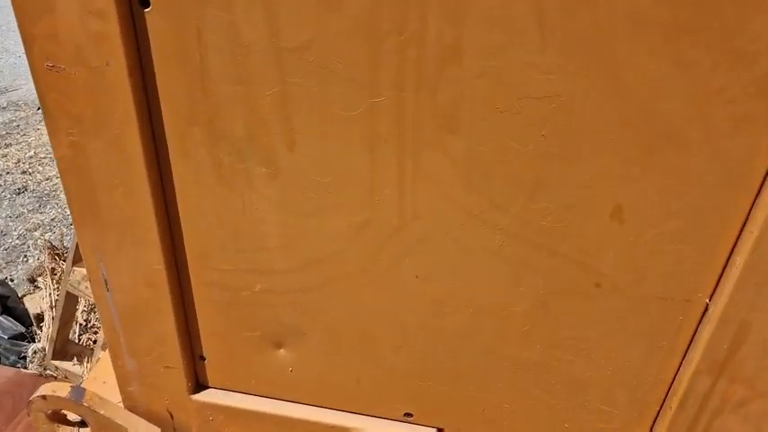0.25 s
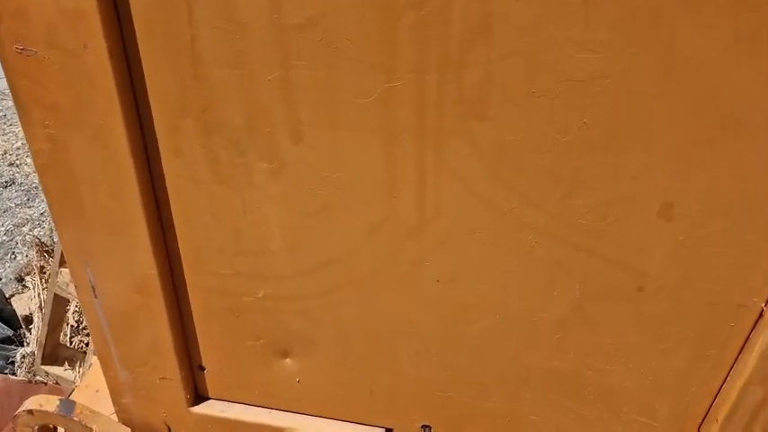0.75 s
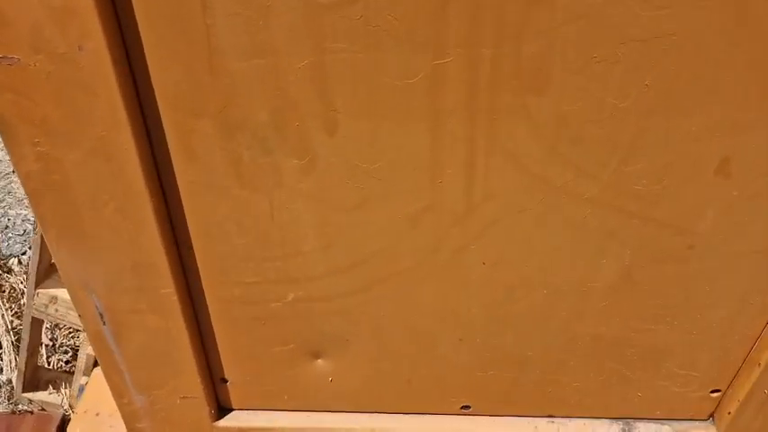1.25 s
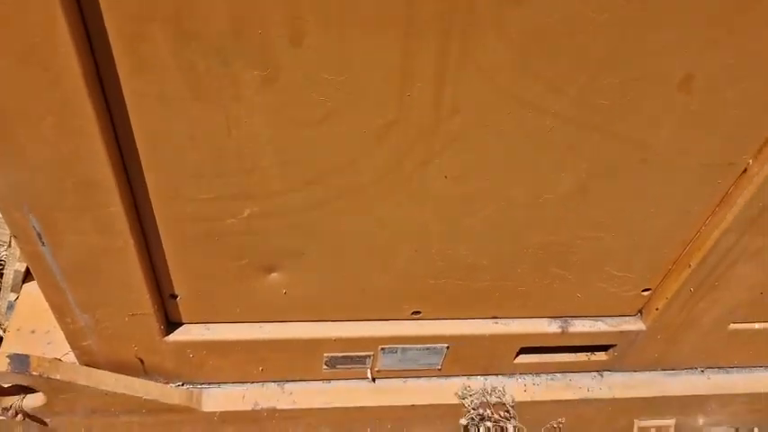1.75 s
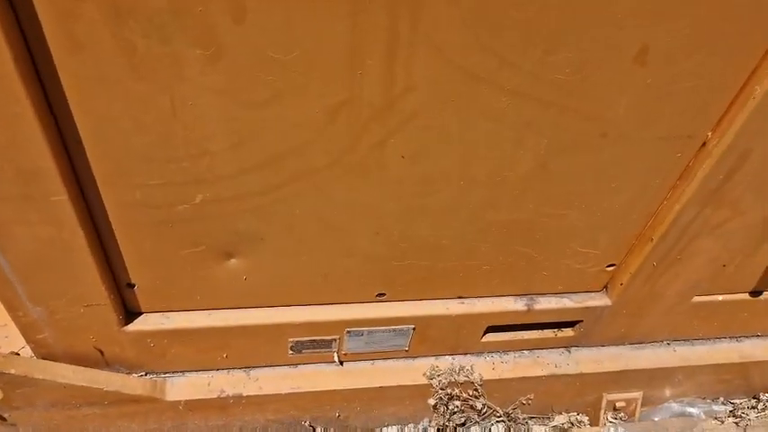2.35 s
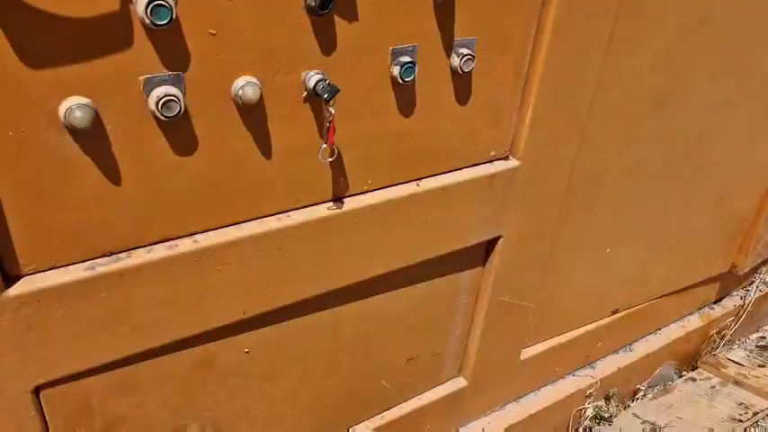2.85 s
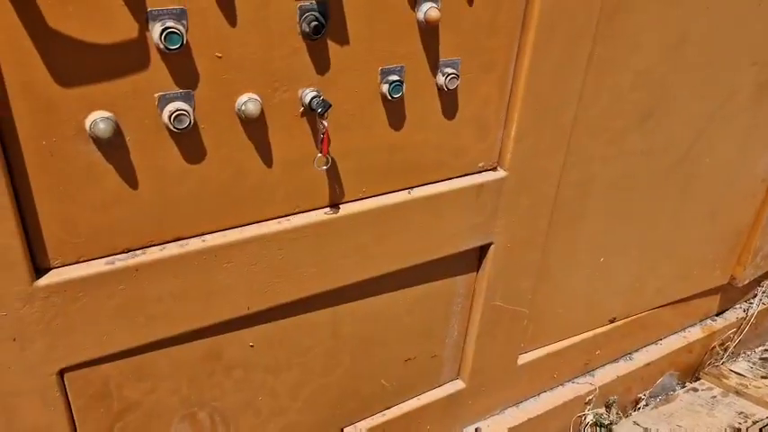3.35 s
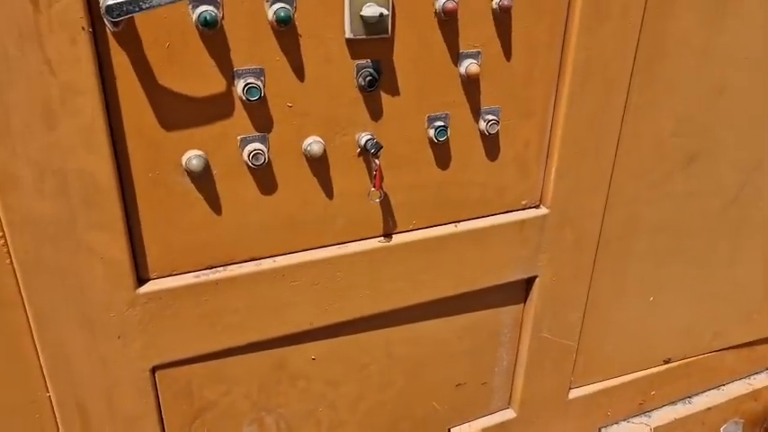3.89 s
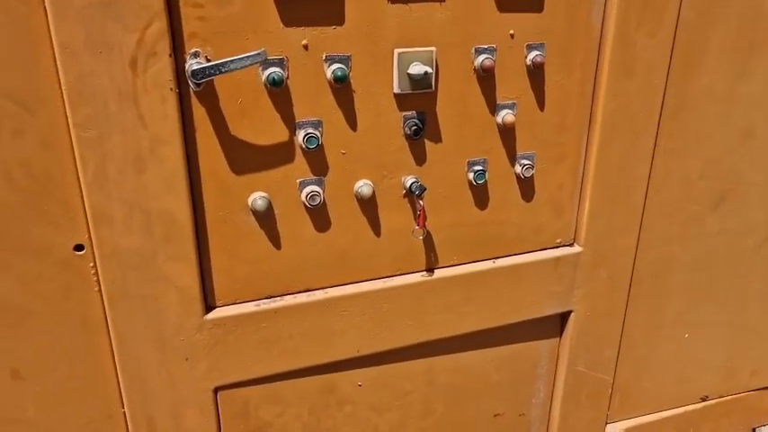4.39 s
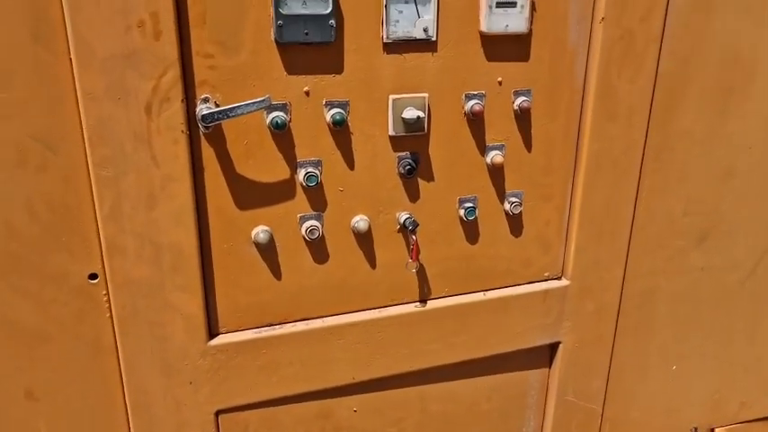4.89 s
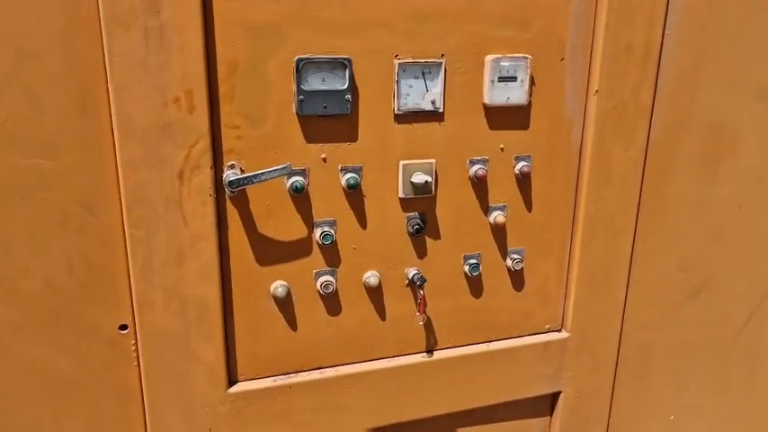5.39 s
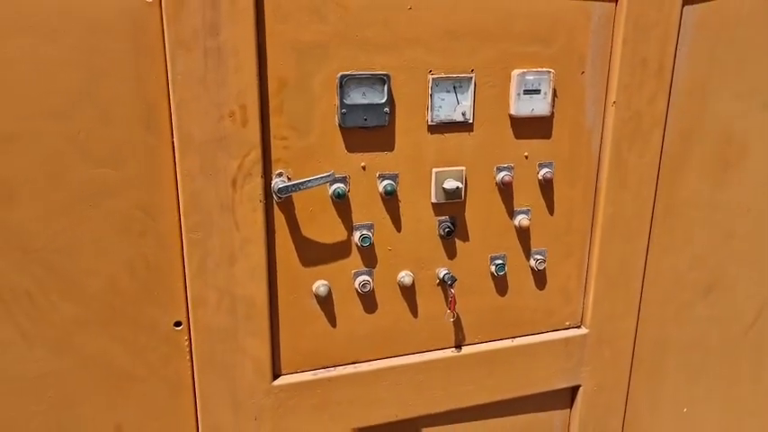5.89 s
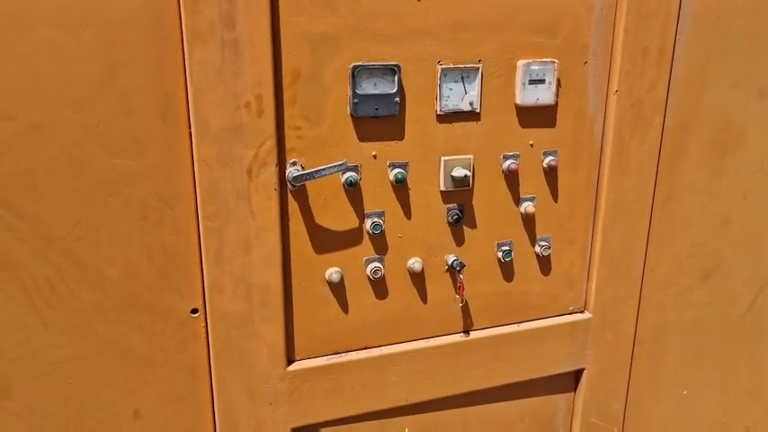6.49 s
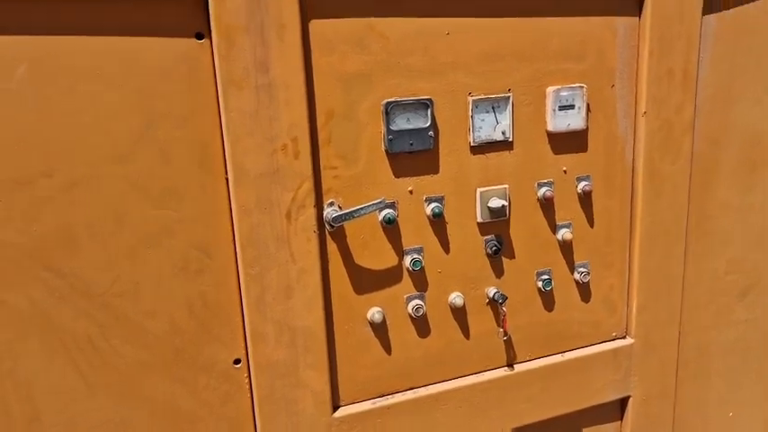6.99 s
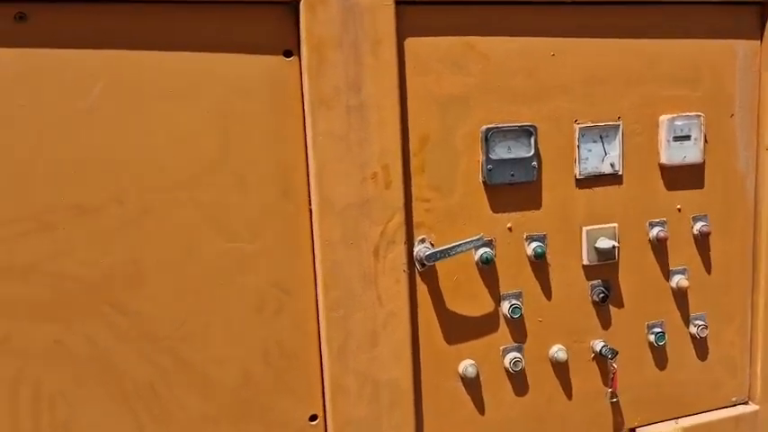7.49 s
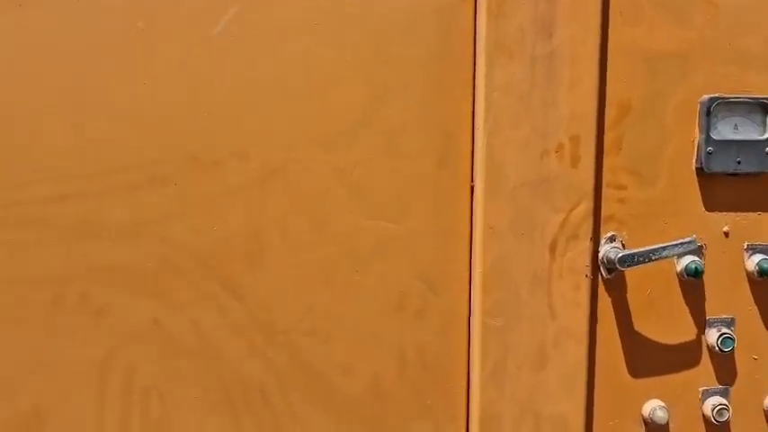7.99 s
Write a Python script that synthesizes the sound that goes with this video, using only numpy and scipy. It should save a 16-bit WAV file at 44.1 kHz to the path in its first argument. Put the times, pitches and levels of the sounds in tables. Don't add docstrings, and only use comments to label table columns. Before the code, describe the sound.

A small handheld stereo microphone catches low traffic rumble, a slowing vehicle's falling hum, soft sleeve rubs and sharp bumps on its case. An abrupt change brings a close diesel engine at constant speed, droning low with cyclic knocking, valve ticks, gear whine and cooling air. Panel echoes make its midrange swell and hollow out. Nearness dips around six seconds, then rises; one hard tap comes just past eight.

```python
import sys
import numpy as np
from scipy import signal
from scipy.fft import rfft, irfft
from scipy.io import wavfile
from scipy.ndimage import uniform_filter1d, map_coordinates

SR = 44100
rng = np.random.default_rng(int(sys.argv[2]) if len(sys.argv) > 2 else 0)


def voltage_ratio(level):
    return 10 ** (np.asarray(level, float) / 20)


def generate_wav(signal):
    frames = np.transpose(np.atleast_2d(signal))
    scaled = np.clip(frames, -1, 1) * 32767
    pcm = np.round(scaled).astype(np.int16)
    wavfile.write(sys.argv[1], SR, pcm)


N = 363825
TIME = np.arange(N) / SR
COARSE = TIME[::5]

# [t/s, f/Hz, level/dB]
TRUCK_TONE = [(0, 46.3, -26), (.3, 43, -23), (.7, 37.2, -28.5), (1.1, 31.6, -27), (1.5, 27.8, -43),
              (1.75, 26, -60)]
# [t/s, f/Hz, level/dB]
TRAILER_TONE = [(0.799, 49, -51), (1.1, 45.5, -48), (1.4, 38.46, -26), (1.7, 33.1, -33.5), (2, 31.3, -46)]
# [f/Hz, level/dB per Hz]
STREET_COLOUR = [(12, -44), (20, -10), (103, -12), (256, -19.5), (349, -16.5), (477, -19.5), (743, -23.5),
                 (824, -22), (988, -23.5), (1280, -22.5), (3360, -41.5), (5360, -38), (10000, -55.5),
                 (13000, -84), (22000, -120)]
# [f/Hz, width/Hz, level/dB, share of the fade]
BODY_HUMS = [(98.8, 8.23, -34.5, 1.7), (176.4, 8.2, -40, 1.44), (289.3, 19, -38, 1.6), (374, 20, -49, 1.4),
             (436, 22, -43, 2.5), (485, 22, -43.5, 2.3), (599, 30, -51, 2.3), (697, 27, -54.5, 0.15),
             (1012, 33, -54, 0.23), (1720, 90, -54, 1.5)]
# [nearest t/s, level/dB, fade/dB per s squared]
PASSES = [
    (.45, -0.5, 10),
    (2.25, -9.5, 26),
]
# [level at a pass/dB, share of the fade, far city level/dB]
STREET_BANDS = [
    (-27.5, 0.82, -32),
    (-32.5, 0.93, -47.5),
    (-44, 1.8, -41.5),
]
# [f/Hz, likeness 0-1]
STREET_ALIKE = [(60, 0.96), (130, 0.98), (290, 1), (640, 0.7), (1410, 0.63), (3100, 0.27), (6820, 0.11),
                (15000, 0.1)]
# [f/Hz, level/dB per Hz]
CLOTH_COLOUR = [(1000, -17), (1500, 0), (2500, -4.5), (5000, -16), (9000, -17.5), (12000, -22),
                (16000, -23.5)]
# [t/s, length/s, level/dB, left-right/dB]
RUBS = [(0.018, 0.017, -59, 0), (0.189, 0.022, -61, 0), (.3, 0.021, -62, 0), (0.356, 0.015, -60, 0),
        (0.401, 0.016, -53, 0), (0.608, 0.031, -66, 0), (0.858, 0.026, -53, -2), (1.421, .015, -66, -8),
        (1.484, .04, -72, -8), (1.606, 0.14, -76, -3), (1.7, 0.048, -63, -18), (1.752, 0.067, -60.5, -18),
        (2.165, 0.15, -68, -1), (2.368, 0.069, -54, -1), (2.812, 0.037, -63, -18)]
# [t/s, width/s, level/dB, left-right/dB]
SWEEPS = [
    (1.65, 0.06, -73, -12),
    (1.94, 0.051, -69, -8),
    (2.27, 0.1, -64, 0),
    (2.5, 0.09, -78, -4),
    (2.82, .05, -80, -10),
]
# [t/s, peak level/dB, left-right/dB]
TOUCHES = [(0.021, -31, -3), (0.868, -23.5, -2), (0.873, -33, -2), (1.4705, -40, -3), (2.155, -42, 0),
           (2.184, -38, 0), (2.203, -35, 2), (2.207, -38, 0), (2.227, -42, 0), (2.234, -33, 0),
           (2.258, -35, 0), (2.264, -38, 0), (2.281, -41, 0), (2.298, -46, 0), (2.314, -41, 0),
           (2.321, -45, 0), (2.372, -45, -1), (2.381, -38, -1), (2.403, -40, -1), (2.422, -41, -1),
           (2.444, -41, -1), (2.387, -37, -1), (2.416, -37, -1), (2.663, -37, -13), (2.816, -38, -11),
           (5.6902, -28, 1), (7.8897, -26, 3)]
# [t/s, crack peak level/dB, thump peak level/dB, thump f/Hz, left-right/dB]
KNOCKS = [(0.8645, -19.5, -22, 4500, -2), (1.4255, -31, -25, 2500, -13), (1.9228, -19.5, -30, 7000, -13),
          (1.71, -22, -23, 4020, -24), (1.7104, -30, -15, 1910, -19.5), (1.7114, -24.5, -28, 2500, -25),
          (2.8234, -35, -15, 1070, -23), (2.8314, -34, -30, 3000, -21), (8.0336, -18, -9.5, 3300, -20),
          (8.0341, -17, -35, 2500, -23)]
SPRING_BACKS = [
    (1.7127, -43, -15.5, 910, -17),
    (2.8323, -50, -23, 650, -19),
    (8.0346, -40, -30, 1500, -15),
]
# [f/Hz, width/Hz, level/dB]
CASE_RINGS = [(400, 1060, -1), (1610, 650, 0), (3140, 2600, -8.5), (7060, 7000, -2.5), (12300, 3500, -6)]

# [t/s, firings per second/Hz]
FIRING_RATE = [(2.9, 66.7), (4.1, 66.77), (6, 66.83), (6.8, 67.06), (7.3, 67.2), (8.25, 67.2)]
# [t/s, extra panel echo path/m, nearness/dB, left-right/dB]
CAMERA_PATH = [(2.92, 0.047, -1.5, 2), (3.6, 0.31, -0.5, 0), (4.2, 0.48, -0.5, 1), (4.9, 0.54, -0.05, -1.5),
               (5.6, 0.72, -1, 0), (6.3, 0.93, -2, -1.5), (6.9, 0.82, -1, -1), (7.3, 0.67, 0.7, -2.5),
               (7.7, 0.45, 2.5, -2.5), (8.25, 0.28, 2, 0.5)]
# [direct level/dB, panel echo strength 0-1, echo phase at the start/turns]
PANEL_ECHO = [(-12, 0.6, 0.37), (-18.5, 0.55, 0.43), (-28.5, 0.81, 0.7), (-29, 0.6, 0.036),
              (-33.5, 0.52, .13)]
SILENCER_PHASE = [-.01, -.08, .3, .2, .02]
# [multiple of the engine cycle, level against the firing note/dB]
UNEVEN_NOTES = [(1, -48), (2, -33), (3, -16), (4, -19), (5, -20), (6, 0), (7, -9), (8, -15), (9, -16),
                (10, -11), (11, -22), (12, -1), (13, -22), (14, -23), (15, -20), (16, -17), (17, -23),
                (18, -5), (19, -19), (20, -28), (21, -21), (22, -30), (23, -17), (24, -12), (25, -25),
                (26, -18), (27, -27), (28, -23), (29, -28), (30, -14)]
PIPE_PHASE = [(3, -.15), (5, 0), (7, -.04), (10, -.36), (11, -.8), (13, -.28), (14, -.62), (16, -.1),
              (18, -.3), (26, -.45)]
# [f/Hz, early level/dB, late level/dB]
GEAR_NOTES = [(446, -53, -51), (468, -48, -52), (602, -47, -45), (669, -48, -45), (703, -51, -46),
              (803, -49, -47), (836, -48, -49), (935, -54, -52), (970, -48, -55), (1105, -60, -50),
              (1129, -54, -53), (1171, -62, -49), (1205, -62, -51), (1238, -60, -50), (1271, -53, -52),
              (1349, -55, -53), (1360, -55, -52), (1371, -55, -54), (1405, -56, -56), (1472, -51, -54),
              (1549, -50, -56), (1249, -55, -42.5), (1394, -55, -51), (1449, -52.5, -47), (1568, -51, -58),
              (1639, -50, -57), (1720, -49, -60), (1867, -62, -53), (2040, -53, -56.5), (2145, -53, -59),
              (2453, -59, -57)]
# [f/Hz, cycle angle 0-1, time to fall 60 dB/s]
STRUCK_PARTS = [(2110, .24, .06), (2130, .59, .05), (2460, .79, .07), (2465, .89, .1), (3200, .27, .04),
                (3220, .79, .05), (3190, .93, .05), (3090, .86, .07), (3680, .74, .07), (4000, .44, .05),
                (4000, .74, .04), (4450, .74, .05), (4450, .89, .05)]
# [cycle angle 0-1, length 0-1 of a cycle, level/dB]
BURSTS = [(.765, 0.08, 7), (.94, 0.05, 5), (.1, 0.02, 5.5), (.265, 0.02, 8.5), (.435, .25, 5.5),
          (.6, 0.03, 3)]
# [f/Hz, share 0-1]
REPEAT_SHARE = [(400, 0.21), (800, 0.8), (1300, 0.71), (2000, 0.55), (3200, 0.38), (5500, 0.14),
                (9000, .05)]
# [f/Hz, level/dB per Hz]
CABINET_COLOUR = [(210, -16), (350, -3.5), (411, -15), (459, -3.5), (522, -13), (685, -7.5), (754, -13),
                  (830, -9.5), (1410, -9.5), (2100, -13.5), (2580, -21), (4380, -23), (5750, -28.5),
                  (14800, -35.5), (16000, -40)]
# [f/Hz, width/Hz, level/dB]
STEEL_RINGS = [(2150, 28, -11), (2350, 15, -21), (3020, 24, -14), (3630, 44, -12), (4300, 620, -3),
               (5440, 38, -24)]
# [f/Hz, level/dB per Hz]
FAN_COLOUR = [(12, -42), (20, -12), (45, -13.5), (75, -14), (206, -10), (392, -23), (500, -32.5),
              (650, -58), (1100, -120)]
# [f/Hz, likeness 0-1]
ENGINE_ALIKE = [(60, 0.86), (130, 1), (290, 0.77), (640, 0.97), (1410, 0.76), (3100, 0.56), (6820, 0.34),
                (15000, 0.2)]
# [f/Hz, left-right/dB]
ENGINE_LEAN = [(60, 7), (180, 4), (550, 1), (1650, -0.5), (4970, -2), (15000, 6)]
# [t/s, width/s, f/Hz, width/octaves, level/dB]
GAPS = [(3.15, 0.42, 1710, 0.081, 7), (3.9, 0.41, 1500, .1, 3), (4.5, 0.37, 1460, .1, 3.5),
        (5.37, 0.52, 1530, 0.2, 5), (6.34, 0.53, 1413, 0.078, 7.5), (6.73, 1.8, 1100, 0.055, 3.5),
        (7.45, 0.16, 1840, 0.072, 5), (8.1, 0.25, 1580, .12, 3.5), (8, 0.34, 830, 0.25, 1.5),
        (3.1, 0.39, 610, 0.28, -5), (8.4, 0.26, 650, .25, -9), (5.2, .4, 3200, 0.04, 8.5),
        (5.45, 0.17, 2460, 0.036, 6.5), (5.2, 0.24, 4360, .06, 4), (6.4, .4, 3100, .06, 4.5),
        (7.2, 0.74, 3300, 0.26, -1), (6.3, 1.7, 870, 0.12, 2), (3.35, 0.46, 2300, 0.074, 5)]
COLOUR_CHANGES = [(3.05, 0.27, 11040, 0.1, 1), (3.24, 0.2, 3350, 0.046, -5), (3.47, 0.25, 1240, 0.12, -6),
                  (3.56, 0.62, 950, 0.13, 2), (3.66, 0.37, 1500, 0.089, 3), (3.7, 0.4, 2460, 0.056, -9),
                  (3.75, 0.34, 11200, 0.24, 3.5), (3.8, 0.8, 2860, 0.045, 9.5), (3.8, 1.3, 8360, 0.045, 2.5),
                  (4.26, 0.45, 14360, 0.046, 3.7), (4.35, 0.36, 780, 0.23, -5), (4.4, 0.54, 567, 0.2, 1),
                  (4.4, 0.52, 3920, 0.05, 7), (4.4, 1.4, 5010, 0.05, -6), (4.49, 0.45, 2150, 0.083, 2.5),
                  (4.49, 1.4, 1800, 0.088, -3.5), (4.59, 1.6, 720, 0.17, 1.5), (4.86, 0.7, 1330, 0.11, 2.5),
                  (5.05, 0.21, 1130, 0.1, -2), (5.42, 0.45, 8720, 0.24, 3.5), (5.47, 0.25, 2580, 0.11, 2),
                  (5.47, 0.3, 11040, 0.1, 0.5), (6.12, 1, 900, 0.074, -1.5), (6.26, 0.36, 1610, 0.09, -3),
                  (6.3, 0.45, 3590, 0.054, 5), (6.68, 0.42, 2400, 0.12, 4.5), (6.68, 1.1, 6350, 0.11, 2),
                  (6.82, 0.8, 3660, 0.15, 0), (6.86, 0.8, 1260, 0.12, 2.5), (7.05, 0.8, 8720, 0.2, -0.5),
                  (7.09, 1.3, 1860, 0.09, 3), (7.37, 0.8, 13780, 0.1, -1), (7.47, 0.54, 2250, 0.12, -5),
                  (7.79, 0.41, 1560, 0.16, 1), (7.79, 0.52, 5100, 0.27, 3.5), (7.98, 0.25, 2860, 0.085, 4),
                  (8.02, 0.29, 10150, 0.24, 4), (8.07, 0.25, 870, 0.2, 2.5)]
# [f/Hz, width/Hz, level/dB]
MIC_PORTS = [(2522, 95, -3.5), (5400, 810, 0.5), (9770, 970, -3.5), (11500, 900, 1.5)]

CLATTER_DB = -31.5


def unit(x):
    return x / np.sqrt(np.mean(x ** 2) + 1e-20)


def along(points, hz):
    f, v = np.transpose(points)
    return np.interp(np.log(hz + 1), np.log(f + 1), v)


def curves(rows, t=TIME):
    s, *cols = np.transpose(rows)
    return [np.interp(t, s, c) for c in cols]


def wobble(rate, t=TIME):
    count = int(N * rate / SR) + 4
    steps = np.arange(0, count - 1, .25)
    return np.interp(t * rate, steps, map_coordinates(rng.standard_normal(count), [steps]))


def bell(t, s, width):
    return np.exp(-((t - s) / width) ** 2)


def sides(pan_db):
    return voltage_ratio([[pan_db / 2], [-pan_db / 2]])


def full_rate(x):
    return signal.resample_poly(x, 5, 1, axis=1)[:, :N]


def frames(pair):
    hz, t, z = signal.stft(pair.astype(np.float32), SR, nperseg=1024)
    return hz[:, None], t, z


def patches(z, bins, steps):
    field = rng.standard_normal(z.shape)
    return unit(uniform_filter1d(uniform_filter1d(field, bins, 1), steps, 2))


def stereo(hz, z, alike, pan_db, twist=0):
    turn = np.arccos(np.clip(along(alike, hz), -1, 1)) / 2
    mid, side = z[0] * np.cos(turn), z[1] * np.sin(turn)
    lean = voltage_ratio(pan_db / 2) * np.exp(-.5j * twist)
    pair = np.array([(mid + side) * lean, (mid - side) / lean])
    return signal.istft(pair, SR, nperseg=1024)[1][:, :N]


def banded(hz, spectrum, centres_hz, edges_hz, levels_db):
    gain = voltage_ratio(along(spectrum, hz))
    shift_db = 0
    for row, db, lo, hi in zip(np.eye(len(levels_db)), levels_db, edges_hz, edges_hz[1:]):
        band_db = 10 * np.log10(np.mean(gain ** 2 * (hz > lo) * (hz < hi)))
        weight = np.interp(np.log(hz + 1), np.log(centres_hz), row)
        shift_db = shift_db + weight * (db - band_db)
    return gain * voltage_ratio(shift_db)


def street_levels(t):
    levels = []
    for pass_db, share, city_db in STREET_BANDS:
        passing = sum(voltage_ratio(pass_db + db - share * fade * (t - s) ** 2) for s, db, fade in PASSES)
        levels.append(20 * np.log10(np.hypot(voltage_ratio(city_db), passing)))
    return levels


def traffic():
    hz, t, z = frames(rng.standard_normal((2, N)))
    gain = banded(hz, STREET_COLOUR, [90, 400, 1500], [25, 200, 700, 4000], street_levels(t))
    gusts = voltage_ratio(-1.2 + 1.53 * patches(z, bins=3, steps=8))
    ear_lag_s = 0.00035
    out = stereo(hz, z * gain * gusts, STREET_ALIKE, 0, 2 * np.pi * hz * ear_lag_s)
    for track in (TRUCK_TONE, TRAILER_TONE):
        pitch, db = curves(track)
        angle = 2 * np.pi * np.cumsum(pitch) / SR
        tone = np.sin(angle) + 0.22 * np.sin(2 * angle)
        out += np.sqrt(2) * voltage_ratio(db + 1.1 * wobble(5.5)) * (TIME < track[-1][0]) * tone
    leaving_db = street_levels(COARSE)[1] + 33
    hums = np.zeros((1, len(COARSE)))
    for hum_hz, width, db, share in BODY_HUMS:
        angle = 2 * np.pi * hum_hz * COARSE
        hum = wobble(width, COARSE) * np.sin(angle) + wobble(width, COARSE) * np.cos(angle)
        hums += voltage_ratio(db + share * leaving_db) * hum
    return out + full_rate(hums)


def rustle():
    held = np.clip(TIME - 0.53, 0, None)
    bed = voltage_ratio(-59 - 21 * held ** 2.8) + voltage_ratio(-70)
    sweeps = sum(bell(TIME, s, width) * voltage_ratio(db) * sides(pan_db) for s, width, db, pan_db in SWEEPS)
    size = voltage_ratio(1.85 * wobble(31.43)) * (bed + sweeps)
    grain = voltage_ratio(1.3 * np.array([wobble(300), wobble(300)]) + 2.3 * wobble(90))
    for s, length, db, pan_db in RUBS:
        span = slice(round(s * SR), round((s + 1.5 * length) * SR))
        rise = (TIME[span] - s) / 0.013
        fall = (s + length - TIME[span]) / (0.39 * length) + .5
        stroke = np.clip(np.minimum(rise, fall), 0, 1)
        size[:, span] += grain[:, span] * stroke * voltage_ratio(db) * sides(pan_db)
    hz, t, z = frames(rng.standard_normal((2, N)))
    hiss = z * banded(hz, CLOTH_COLOUR, [10000], [8000, 15500], [0])
    return size * stereo(hz, hiss, [(1000, 0.04)], 0)


def taps():
    out, t = np.zeros((2, N + SR)), np.arange(SR // 10) / SR
    hz = np.fft.rfftfreq(len(t), 1 / SR)
    case = 0
    for k, (c, w, db) in enumerate(CASE_RINGS):
        case = case + (-1) ** k * voltage_ratio(db) * 1j * hz * w / (c * c - hz * hz + 1j * hz * w)
    hits = [(s, db, db - 15, 750, pan, 0.017, 1) for s, db, pan in TOUCHES]
    for rows, way in ((KNOCKS, 1), (SPRING_BACKS, -1)):
        for row in rows:
            t60 = 0.0031 * voltage_ratio(-0.33 * (row[2] + 24))
            hits.append((*row, t60, way))
    for s, db, thump_db, thump_hz, pan_db, t60, way in hits:
        crack = rng.standard_normal(len(t)) * voltage_ratio(-60 * t / t60)
        crack = irfft(rfft(crack) * case, len(t))
        beats = thump_hz * t
        push = np.sin(2 * np.pi * 0.45 * np.log(1 + 2.8 * beats)) * np.exp(-beats / 3)
        push += voltage_ratio(-23.5 - 60 * t / 0.015) * np.sin(2 * np.pi * 1320 * t)
        hit = voltage_ratio(db - 1) * crack / np.abs(crack).max() + way * voltage_ratio(thump_db) * push
        start = round(s * SR)
        out[:, start:start + len(t)] += hit * sides(pan_db)
    return out[:, :N]


def cycle():
    return np.cumsum(curves(FIRING_RATE)[0]) / SR / 6 + .905


def firing_levels(path_m, near_db):
    turn = path_m * FIRING_RATE[1][1] / 343
    levels = []
    for k, (db, echo, phase) in enumerate(PANEL_ECHO):
        both = abs(1 + echo * np.exp(2j * np.pi * (phase + (k + 1) * turn)))
        levels.append(db + near_db + 20 * np.log10(both))
    return levels


def order(k, turns, level_db, lead, spread):
    angle = 2 * np.pi * (k * turns[::5] + lead + 0.0039 * wobble(1.43, COARSE))
    ports = np.array([[-1], [1]]) * (0.0019 * k + spread * wobble(0.95, COARSE))
    return np.sqrt(2) * voltage_ratio(level_db) * np.cos(angle + ports)


def exhaust(turns):
    path_m, near_db, _ = curves(CAMERA_PATH, COARSE)
    firing_db = firing_levels(path_m, near_db)
    mean_db = np.mean(firing_db[:3], axis=0) + 2
    early = .3 * np.clip(path_m - .36, 0, 1)
    strong_cylinder = .935
    out = 0
    for k, db in UNEVEN_NOTES:
        beat = int(k) // 6
        if k % 6 == 0:
            lead = (beat > 1) * beat * early + SILENCER_PHASE[beat - 1]
            level_db = firing_db[beat - 1] + 0.47 * wobble(6, COARSE)
            out = out + order(k, turns, level_db, lead, spread=0.02)
        else:
            pipe = np.interp(k, *np.transpose(PIPE_PHASE))
            scatter = .1 * (rng.random() - .5)
            lead = k * (early / 6 - strong_cylinder) - .5 + pipe + scatter
            level_db = (mean_db if k < 20 else mean_db.mean()) + db + 1.27 * wobble(1.15, COARSE)
            out = out + order(k, turns, level_db, lead, spread=0.07)
    return full_rate(out * sides(.4))


def gaps_db(hz, t):
    s, width, centre_hz, octaves, db = np.transpose(list(GAPS) + list(COLOUR_CHANGES))
    colour_db = db * bell(np.log2((hz + 1) / centre_hz), 0, octaves)
    return colour_db @ bell(t, s[:, None], width[:, None])


def whine(turns):
    late = np.clip((COARSE - 4) / 3, 0, 1)
    lifts_db = gaps_db(np.array(GEAR_NOTES)[:, :1], COARSE[::40])
    lifts_db = lifts_db.repeat(40, axis=1)[:, :len(COARSE)]
    out = 0
    for (hz, early_db, late_db), lift_db in zip(GEAR_NOTES, lifts_db):
        level_db = early_db + late * (late_db - early_db) + 1.37 * lift_db + 1.06 * wobble(1.51, COARSE)
        k = round(hz * 6 / 66.9)
        out = out + order(k, turns, level_db, rng.random(), spread=0.36)
    return full_rate(out)


def pings(turns):
    out, count = 0, int(turns[-1]) + 3
    cycle_times = np.interp(np.arange(count), turns, TIME)
    lifts_db = 1.5 * gaps_db(np.array(STRUCK_PARTS)[:, :1], cycle_times)
    for (hz, at, t60), lift_db in zip(STRUCK_PARTS, lifts_db):
        since = (turns - at) % 1 * 6 / FIRING_RATE[0][1]
        blow = voltage_ratio(lift_db + 1.3 * rng.standard_normal((2, count)))
        fade = (1 - np.exp(-since / 0.0054)) * np.exp(-np.log(1000) * since / t60)
        ring = np.sin(2 * np.pi * hz * since) * fade
        out = out + blow[:, (turns - at + 1).astype(int)] * ring
    return out * voltage_ratio(-38)


def clatter_level(t):
    path_m, near_db, _ = curves(CAMERA_PATH, t)
    return CLATTER_DB + 6 * path_m + 0.83 * near_db


def pattern(turns, drift):
    size = round(6 * SR / FIRING_RATE[0][1])
    slow = TIME * drift
    knot, mix = slow.astype(int), slow % 1 * np.pi / 2
    table = rng.standard_normal((2, knot[-1] + 2, size))
    at = (turns % 1 * size).astype(int)
    return table[:, knot, at] * np.cos(mix) + table[:, knot + 1, at] * np.sin(mix)


def clatter(turns):
    angle = turns % 1
    swell_db = sum(db * np.exp(-((angle - a) % 1) / w) for a, w, db in BURSTS)
    swell_db = signal.fftconvolve(swell_db * (1 + 0.12 * wobble(11)), np.hanning(200) / 100, "same")
    fresh = rng.standard_normal((2, N))
    hz, t, knock = frames(unit(pattern(turns, 0.9) * voltage_ratio(0.41 * swell_db)))
    quick = frames(unit(pattern(turns, 2.2) * voltage_ratio(0.3 * swell_db)))[2]
    knock = np.where(hz < 1300, knock, quick)
    mild = frames(unit(fresh * voltage_ratio(0.1 * swell_db)))[2]
    strong = frames(unit(fresh * voltage_ratio(1.45 * swell_db)))[2]
    bright = np.clip(np.log(hz / 1500 + 1e-9) / 1.74, 0, 1)
    share = along(REPEAT_SHARE, hz)
    z = np.sqrt(share) * knock + np.sqrt(1 - share) * (mild + bright * (strong - mild))

    level, pan_db = clatter_level(t), curves(CAMERA_PATH, t)[2]
    upper = level - 8.5 - 2 * np.clip((t - 7) / 0.31, 0, 1)
    top = -42.5 + 0.62 * (level - CLATTER_DB)
    z = z * banded(hz, CABINET_COLOUR, [1500, 3800, 9000], [400, 2500, 6000, 15500], [level, upper, top])
    vent_db = gaps_db(hz, t) - 2
    for c, w, db in STEEL_RINGS:
        vent_db = vent_db + (5 + 0.15 * db) / (1 + ((hz - c) / (w / 2 + 20)) ** 2)
    echoes_db = patches(z, bins=3, steps=40)
    echo_twist = 0.84 * np.clip(hz / 1000, 0, 3) * patches(z[:1], bins=8, steps=50)[0]
    twist = 2 * np.pi * hz * .00009 + echo_twist
    swing = np.clip(hz / 2500, 0, 1) * (pan_db - pan_db.mean())
    return stereo(hz, z * voltage_ratio(vent_db + echoes_db), ENGINE_ALIKE, along(ENGINE_LEAN, hz) + swing, twist)


def fan():
    hz, t, z = frames(rng.standard_normal((2, N)))
    gain = voltage_ratio(along(FAN_COLOUR, hz) + patches(z, bins=3, steps=10))
    air = stereo(hz, z * gain, ENGINE_ALIKE, .3)
    return voltage_ratio(-28 + 0.76 * (clatter_level(TIME) + 29)) * unit(air)


def scene():
    street = traffic() + rustle()
    touches = taps()
    turns = cycle()
    running = exhaust(turns) + whine(turns) + pings(turns) + clatter(turns) + fan()
    change_s, blend_s = 2.92, .0007
    splice = np.clip((TIME - change_s) / blend_s + .5, 0, 1)
    return (1 - splice) * street + splice * running + touches


def roll_off(x):
    return signal.sosfilt(signal.butter(12, 16680, fs=SR, output="sos"), x)


def record(dry):
    hz = np.fft.rfftfreq(N, 1 / SR)
    colour = voltage_ratio(sum(db * bell(hz, c, w) for c, w, db in MIC_PORTS))
    edge = np.clip((16150 - hz) / 300, 0, 1)
    mix = np.clip(irfft(rfft(dry) * colour * edge, N), -1, 1)
    return roll_off(mix)


dry = scene()
out = record(dry)
generate_wav(out)
```